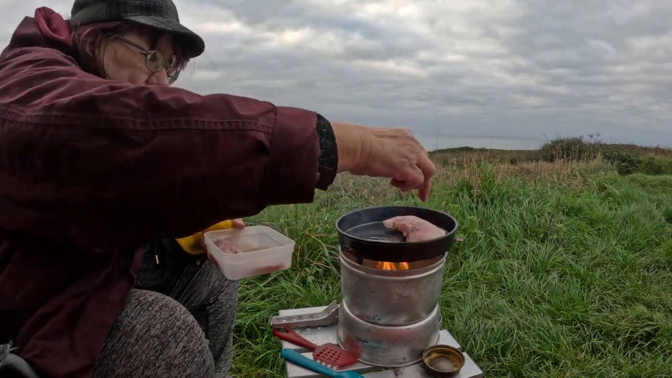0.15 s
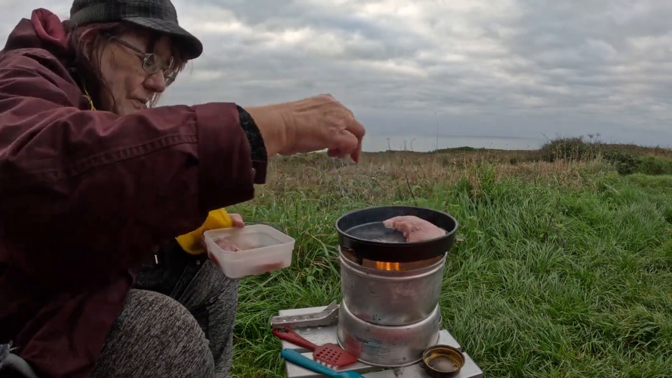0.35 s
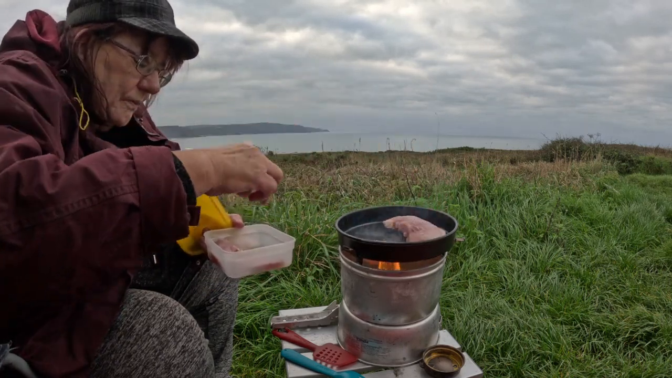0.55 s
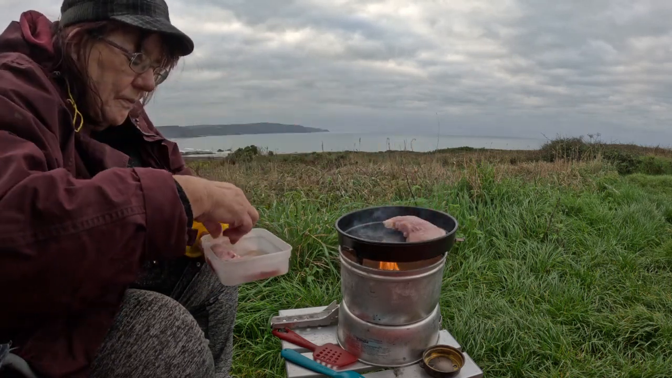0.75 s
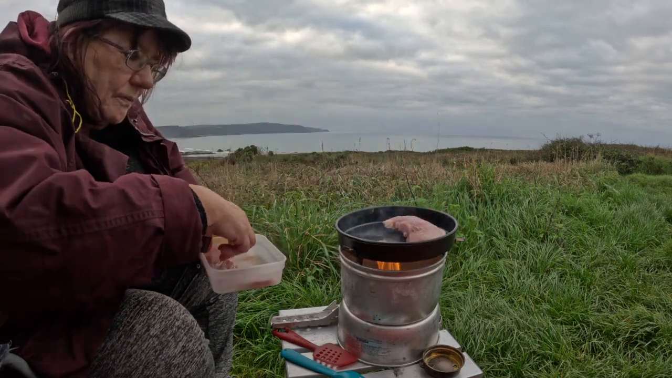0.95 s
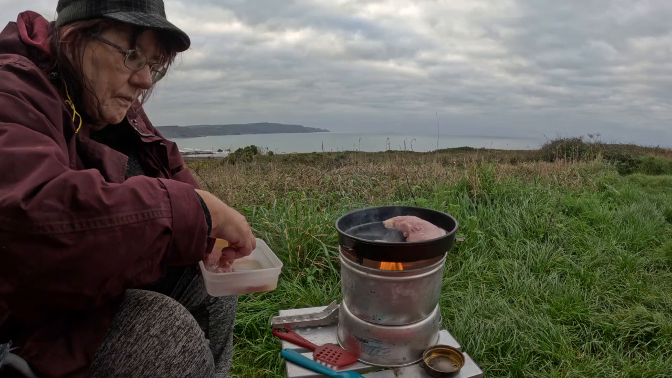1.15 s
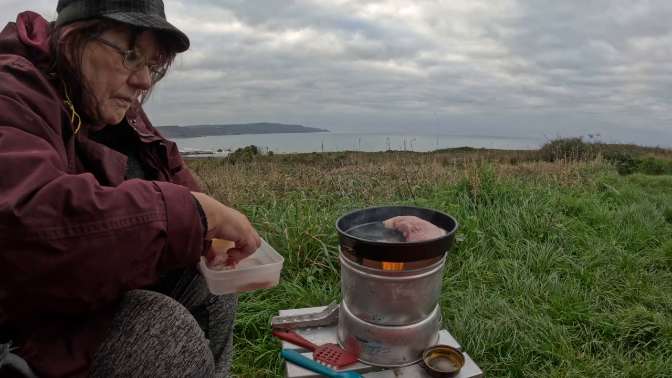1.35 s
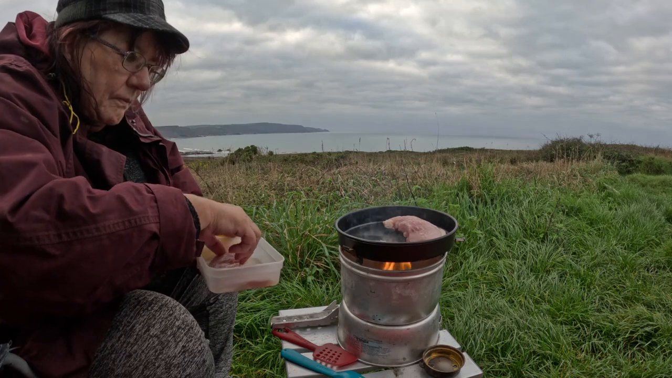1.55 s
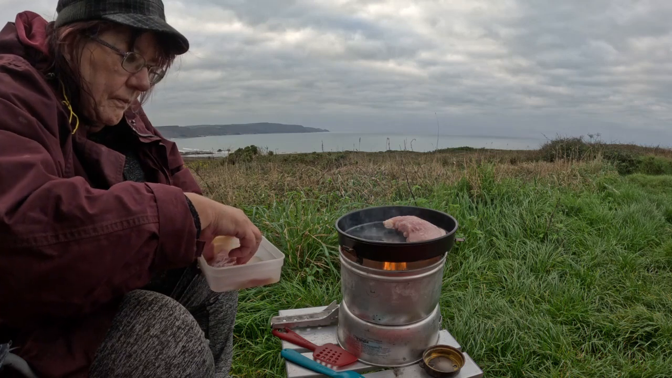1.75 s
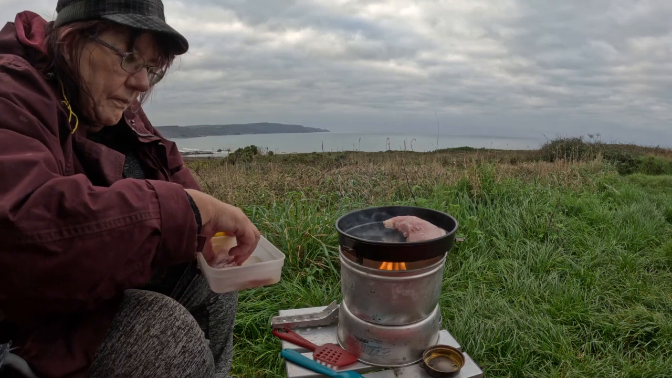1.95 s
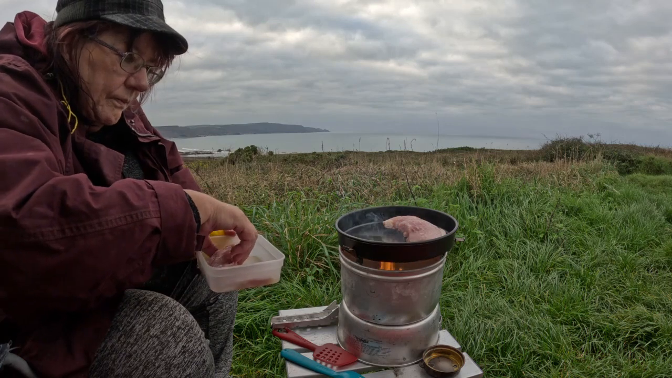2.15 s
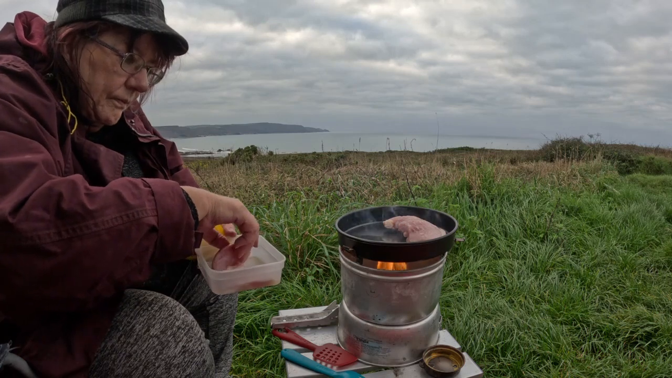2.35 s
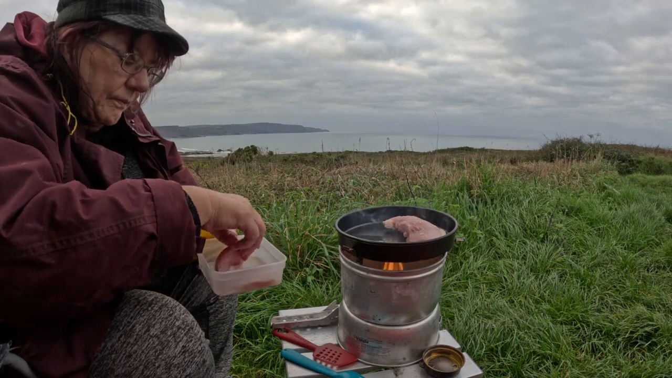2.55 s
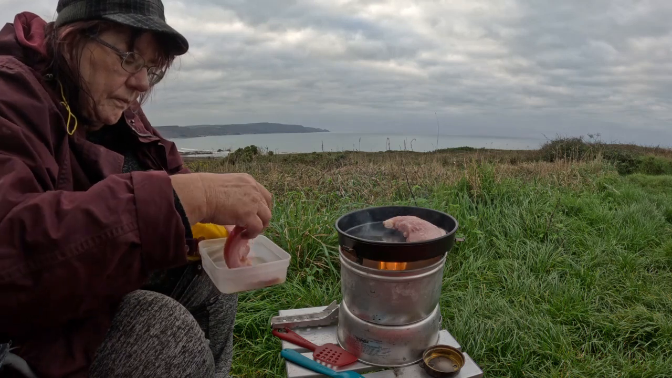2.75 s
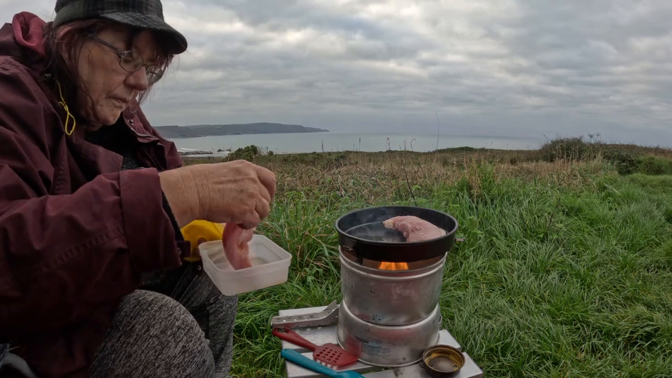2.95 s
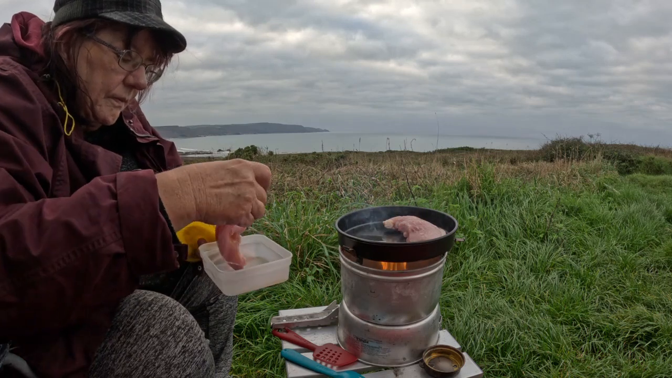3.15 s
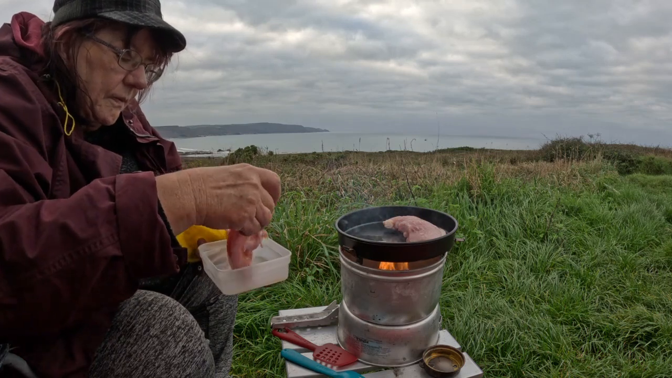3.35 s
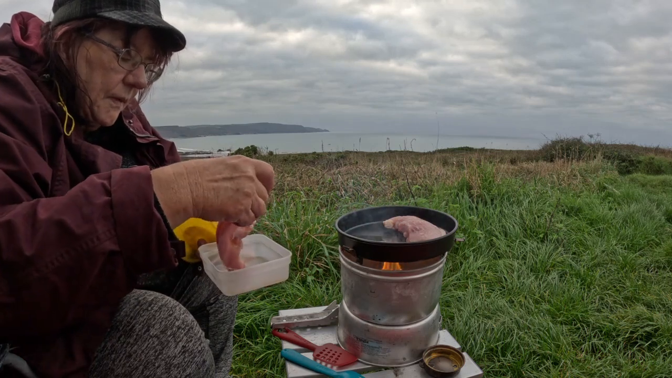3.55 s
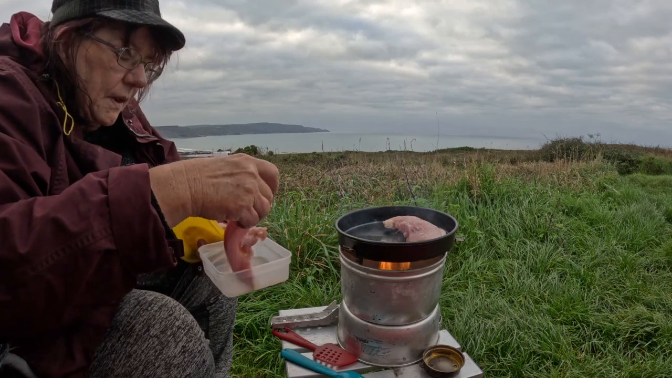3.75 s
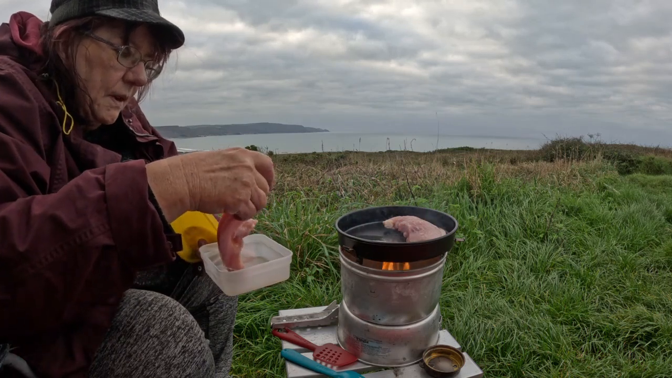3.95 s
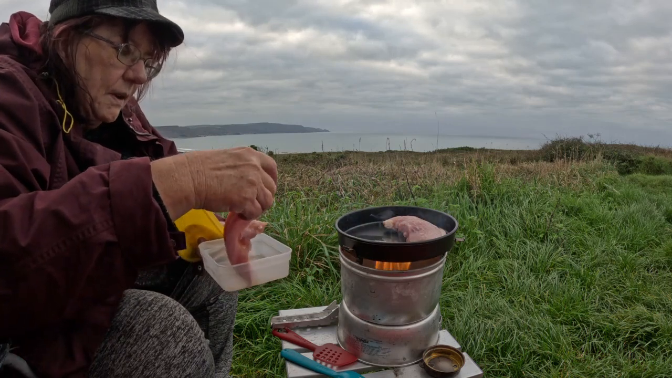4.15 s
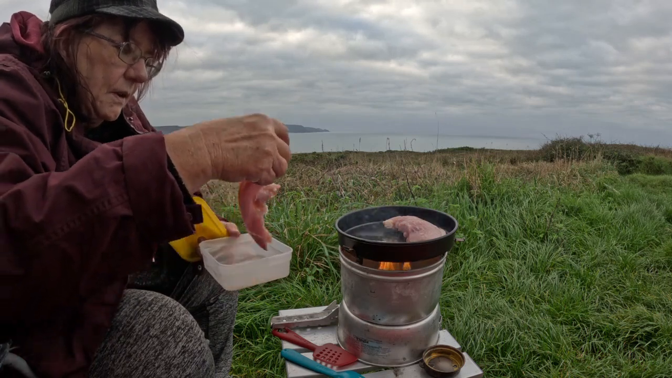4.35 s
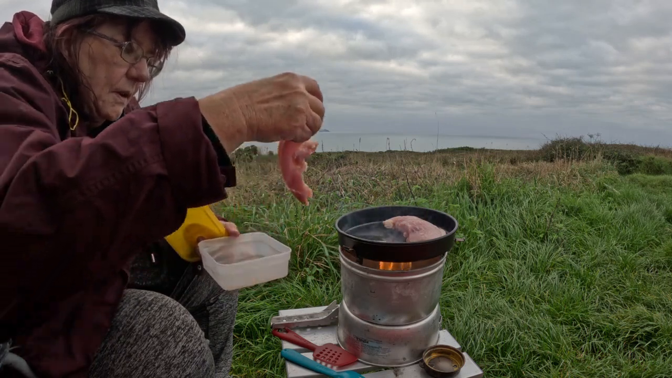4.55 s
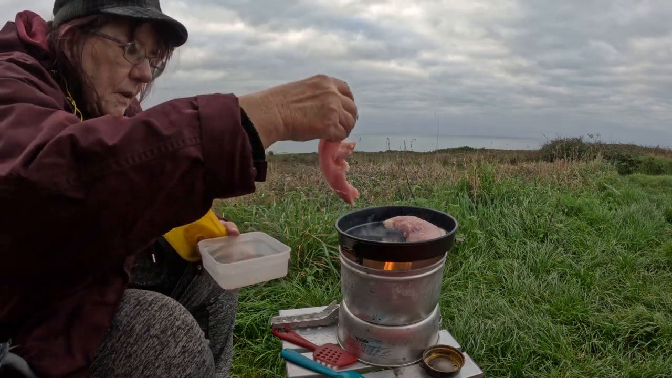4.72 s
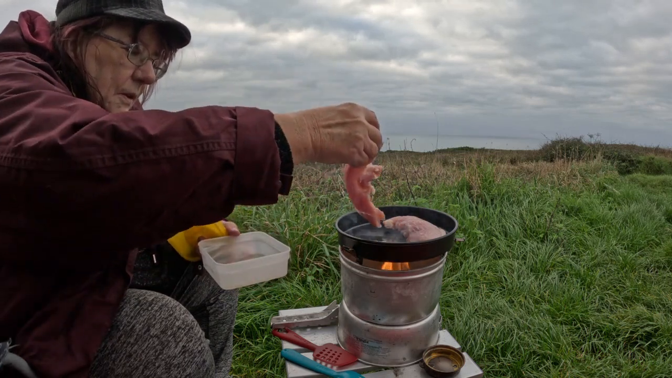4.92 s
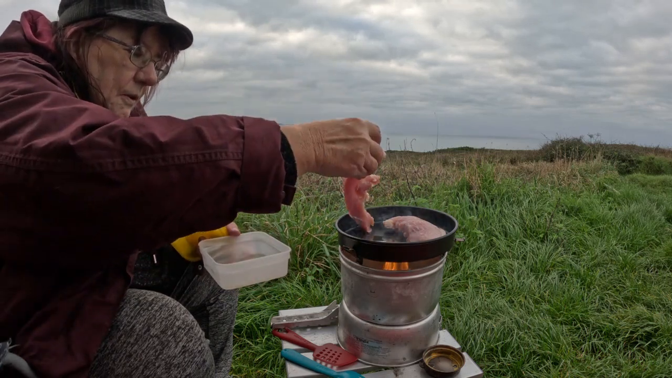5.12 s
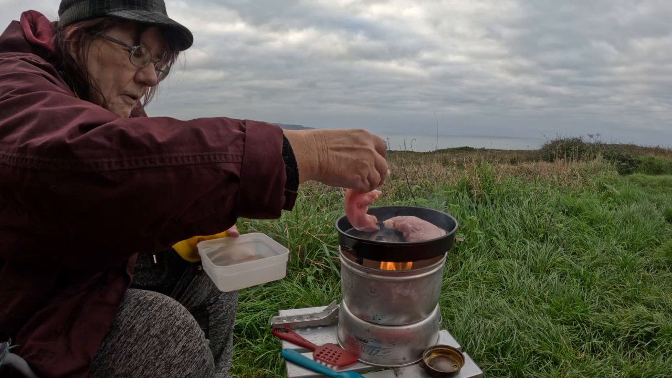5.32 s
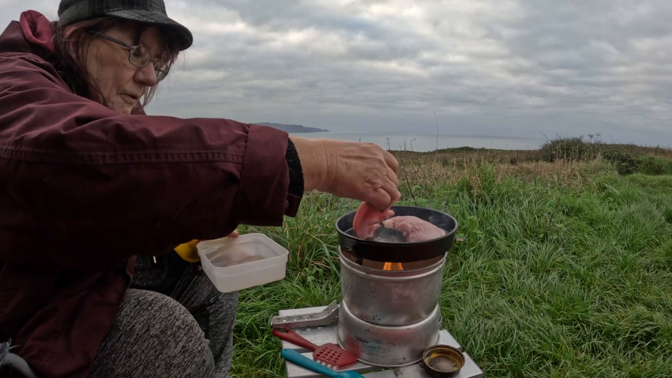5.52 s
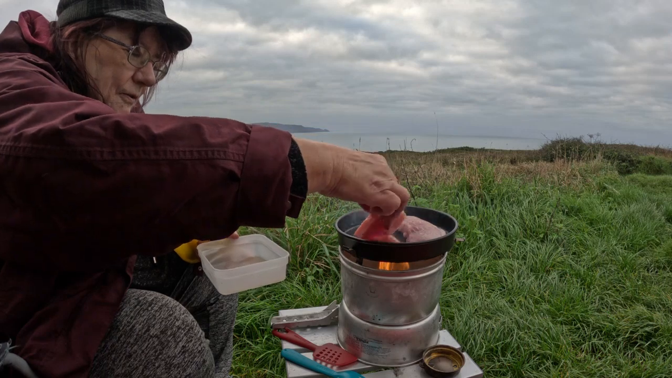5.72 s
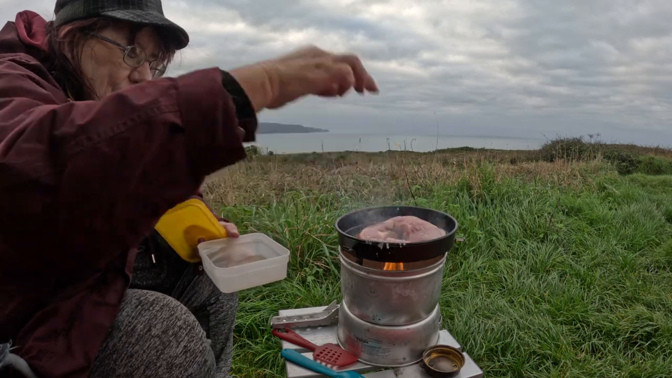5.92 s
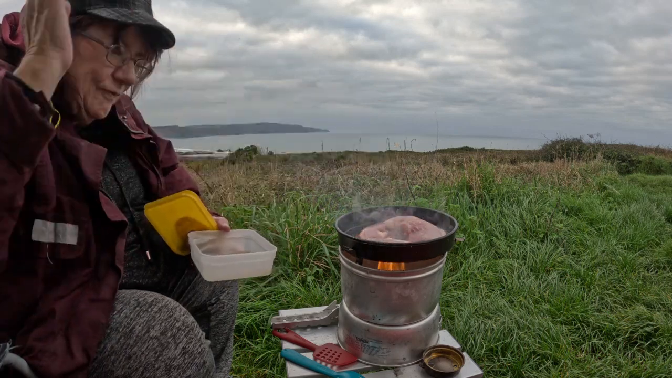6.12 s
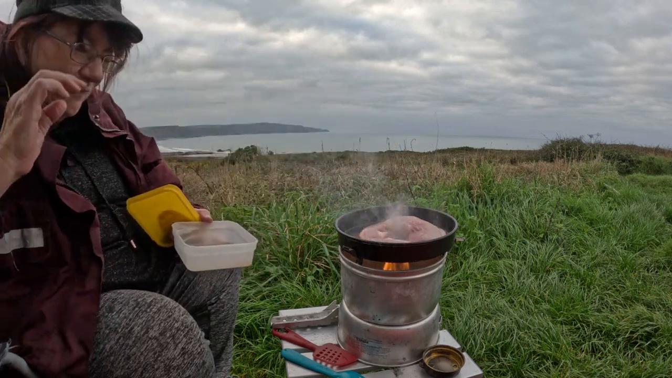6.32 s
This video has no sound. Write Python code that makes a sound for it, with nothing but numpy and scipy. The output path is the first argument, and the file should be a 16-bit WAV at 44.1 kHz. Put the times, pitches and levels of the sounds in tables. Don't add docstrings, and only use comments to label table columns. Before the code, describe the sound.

Steady crackling fry of meat on a camp stove in open air, a brief wind thump on the microphone, then a fierce wet sizzle at the end.

```python
import sys
import numpy as np
from scipy import signal
from scipy.fft import rfft, irfft, next_fast_len
from scipy.io import wavfile
from scipy.ndimage import uniform_filter1d

SR = 44100
rng = np.random.default_rng(int(sys.argv[2]) if len(sys.argv) > 2 else 0)


def ratio(d):
    e = np.asarray(d, float) / 20
    return 10 ** e


def materialize(psi):
    bounded = np.clip(np.atleast_2d(psi).T, -1, 1)
    quanta = np.round(bounded * 32767).astype(np.int16)
    wavfile.write(sys.argv[1], SR, quanta)


N = 281358
SECONDS = np.arange(N) / SR
SECOND_PIECE_S = 5.44

# time in seconds, wind level in dB, surf level in dB.
AIR_LEVELS = [(0, -34, -42), (.4, -41, -44.5), (1.0, -30, -41), (1.3, -38, -39.5), (2.0, -41, -39),
              (2.6, -36.5, -45), (3.3, -35.5, -45), (3.9, -35.5, -51.5), (4.3, -28.5, -45), (4.7, -33, -45),
              (5.2, -34.5, -49), (5.56, -34.5, -52), (5.7, -36, -51), (6.0, -33, -60), (6.13, -43, -50),
              (6.38, -40, -56)]
# frequency in Hz, level in dB per Hz.
WIND_COLOUR = [(8.8, -50), (15, -0.5), (54, 2.5), (67, -1.5), (86, -7.5), (100, -12.5), (130, -48),
               (220, -120)]
# frequency in Hz, level in dB per Hz.
SURF_COLOUR = [(44, -39.5), (75, 5), (86, -4), (117, 1.5), (230, -11), (300, -52), (510, -120)]
# frequency in Hz, level in dB per Hz.
HISS_COLOUR = [(110, -30.5), (180, -4), (226, -8), (248, -6.5), (286, -3), (316, -9.5), (340, -8),
               (860, -12.5), (1120, -50), (1890, -120)]
# time in seconds, firing rate in Hz, level in dB at that rate and at its double.
ENGINE_WORK = [(0, 56.04, -40, -44), (.7, 57, -40, -48), (1.3, 56.27, -43, -45), (1.6, 57.8, -43, -82),
               (2.2, 62.1, -50.5, -65), (3, 61.5, -45, -53), (4.2, 62.02, -45.5, -63), (5, 56.9, -53, -58),
               (5.6, 55.95, -43.5, -53), (6.1, 54, -35.5, -58), (6.38, 53.3, -63, -59)]
# frequency in Hz, rms level in dB.
HUM_LINES = [(167, -64.5), (222, -63), (283, -69.5), (345, -71.5)]
# start in seconds, height in dB, eddies per second, length in seconds.
BUFFETS = [
    (5.736, -11, 25.9, .1),
    (5.84, -20, 22.8, 0.12),
    (5.764, -21, 75, 0.1),
]

# start in seconds, peak in dB, pitch in Hz,
# time to fade by 60 dB in seconds.
KNOCK_EVENTS = [(.152, -30, 626, 0.086), (.652, -37, 275, 0.12), (.668, -37, 298, .12),
                (3.6, -38, 560, 0.047), (4.084, -38, 950, 0.044), (4.083, -31, 1350, 0.033),
                (4.085, -33, 1800, 0.054), (4.084, -29, 2180, .035), (3.3, -44, 530, 0.03),
                (3.898, -35, 855, 0.018), (0.46, -39, 3700, 0.046), (6.3, -28, 1266, .02),
                (5.553, -30, 2150, .02)]

# time in seconds, level in dB.
FIRST_BOIL = [
    (0, -24.5),
    (.012, -36.5),
    (.11, -40.5),
    (.16, -28.5),
    (.46, -30.5),
    (1.1, -32.5),
    (2.0, -34.5),
    (5.1, -35),
    (5.36, -33.5),
]
# time in seconds, level in dB.
SECOND_BOIL = [
    (5.44, -35.5),
    (5.561, -32),
    (5.63, -29.5),
    (5.75, -26.5),
    (5.87, -27.5),
    (5.92, -22),
    (6.0, -20),
    (6.2, -20.5),
    (6.38, -21),
]
# peak in seconds, level in dB.
FLASHES_OF_SPRAY = [
    (.343, -36),
    (.445, -38),
    (1.69, -40),
    (5.24, -40),
    (5.33, -39),
    (5.43, -38),
    (5.637, -26),
    (5.762, -21.5),
    (5.88, -26),
]
# peak in seconds, level in dB.
COLLAPSES = [
    (5.59, -46),
    (5.8, -46),
    (5.93, -37),
    (6.0, -41),
    (6.09, -37),
    (6.14, -31),
    (6.2, -36),
    (6.3, -36),
    (6.375, -38),
]
# peak in seconds, level in dB, pitch in Hz.
STEAM_SQUIRTS = [(5.51, -31, 3290), (5.585, -22.5, 3110), (5.605, -25, 2450), (5.63, -25, 3194),
                 (5.66, -28.5, 3320), (5.7, -25, 3170), (5.738, -17.5, 4010), (5.752, -30, 3550),
                 (5.928, -29, 3686), (5.96, -25, 2400), (6.005, -19, 3300), (6.037, -19, 3960),
                 (6.142, -20.5, 3505), (6.25, -22, 3140)]
# start in seconds, peak
# in dB, pitch in Hz.
SPIT_EVENTS = [(0.2263, -12, 2680), (0.2946, -13, 2660), (0.342, -4.5, 5750), (0.349, -10, 6500),
               (0.425, -5, 4820), (0.448, -6, 5670), (0.6412, -11, 4070), (1.381, -11, 2680),
               (1.679, -10, 6000), (1.691, -11, 3260), (1.8324, -11.5, 6700), (0.811, -17, 3800),
               (2.09, -10.5, 4880), (2.6194, -13, 2930), (3.367, -12, 3860), (3.647, -11.5, 7010),
               (4.807, -12.5, 7370), (5.205, -14, 3820),
               (5.6374, -5.5, 7640), (5.649, -9, 7750), (5.7778, -5, 7500), (5.871, -4, 8060),
                (5.926, 0, 3710), (5.997, -3, 3440), (6.0367, -10, 4030), (6.0886, -7, 4016),
                (6.14, -3, 3400), (6.1587, -5, 3020), (6.256, -3, 3240)]
# peak in
# seconds, level in dB, pitch in Hz.
POP_EVENTS = [(0.167, -21, 2800), (0.2284, -17, 5380), (0.2937, -15, 4570), (0.35, -18, 2580),
              (0.4471, -11, 5680), (0.5661, -20, 2760), (0.643, -17.5, 4010), (0.9818, -25, 3700),
              (1.362, -16, 2580), (1.4604, -22, 2630), (1.5478, -23, 4220), (1.594, -17, 8140),
              (1.68, -16, 7880), (1.6911, -20, 3960), (1.7386, -23, 2760), (1.8364, -19, 3920),
              (1.91, -24, 3770), (2.054, -24, 3790), (2.0929, -20, 2630), (2.2328, -21, 3960),
              (2.2399, -22, 2930), (2.354, -23, 3790), (2.367, -19, 3750), (2.4458, -17, 3700),
              (2.512, -19, 2900), (2.545, -23, 3960), (2.5811, -22, 4010), (2.6197, -16, 3700),
              (2.789, -19, 3810), (2.8789, -22, 3880), (3.0023, -26, 3880), (3.0076, -24, 3880),
              (3.0812, -17, 3830), (3.1668, -20, 3750), (3.2318, -14, 3820), (3.2987, -23, 2930),
              (3.368, -21, 3830), (3.412, -23, 3625), (3.5636, -25, 3230), (3.648, -20, 7110),
              (3.69, -23, 3150), (3.721, -24, 2670), (4.0834, -17, 3750), (4.144, -23, 3790),
              (4.212, -23, 3960), (4.3715, -15, 3750), (4.4257, -27, 2760), (4.484, -24.5, 2880),
              (4.665, -18, 3650), (4.6762, -20, 2800), (4.7176, -17, 3140), (4.7993, -19, 2890),
              (4.8405, -24, 3620), (4.9254, -20, 3750), (5.0232, -27, 3960), (5.0845, -15, 3490),
              (5.1434, -20, 3920), (5.1795, -14, 5940), (5.242, -17, 3960), (5.3951, -22, 7670),
              (5.458, -24, 2757), (5.4701, -20, 3190), (5.4856, -21, 3660), (5.511, -22, 2800),
               (5.5544, -21, 3270), (5.576, -12, 4130), (5.5872, -8, 3270), (5.594, -13, 3235),
               (5.6024, -22.5, 2430), (5.6194, -18, 3060), (5.6294, -16, 3400), (5.6393, -12, 3570),
               (5.6511, -16, 7880), (5.66, -16, 3140), (5.6843, -11, 4360), (5.689, -14, 7360),
               (5.6983, -15, 3830), (5.7072, -14, 4010), (5.7367, -10, 4010), (5.742, -12, 4180),
               (5.7807, -14, 5940), (5.7935, -13, 3620), (5.823, -16, 5640), (5.8348, -19, 6130),
               (5.844, -13, 5730), (5.8746, -11, 5120), (5.887, -11, 3750), (5.9059, -9, 3700),
               (5.9109, -10, 3570), (5.9285, -9, 3960), (5.9446, -10, 3490), (5.9529, -14, 3660),
               (5.967, -6, 4440), (5.9964, -10, 3450), (6.0118, -3, 2540), (6.0215, -8, 3320),
               (6.041, -9, 4010), (6.0508, -9, 2630), (6.0622, -10, 3490), (6.0695, -12, 3490),
               (6.0907, -11, 3360), (6.0968, -14, 3880), (6.1174, -7, 3660), (6.1329, -11, 2450),
               (6.1427, -8, 2330), (6.161, -11, 3190), (6.1672, -9, 2630), (6.1898, -13, 4180),
               (6.2063, -14, 3660), (6.2233, -5, 2900), (6.2293, -7, 3530), (6.2382, -7, 2840),
               (6.2559, -9, 3450), (6.2741, -8, 3620), (6.299, -7, 3530), (6.3049, -11, 7280),
               (6.3113, -11, 3660), (6.3399, -7, 3060), (6.371, -11, 2540), (6.3756, -10, 5560)]

# frequency in Hz, level in dB per Hz.
BURST_COLOUR = [(300, -14.5), (600, -14.5), (1000, -13), (1600, -12), (2300, -7), (3200, -3.5), (5000, -6),
                (7000, -7), (9000, -12), (11000, -12), (13000, -20.5), (14500, -40), (16000, -76)]
# frequency in Hz, width in Hz, height in dB.
FIRST_PAN = [(685, 100, 8), (840, 37, -11), (1165, 700, 6.5), (1417, 52, 4.5), (1452, 37, -6),
             (1814, 59, 11.5), (1900, 154, -9), (2210, 22, 5.5), (2344, 100, -8.5), (2640, 99, 2),
             (2680, 410, 3.5), (3230, 270, -3.5), (3350, 130, 0.5), (3740, 750, 5.5), (4830, 290, 3.5),
             (5520, 200, -2), (6030, 35, 7), (6250, 80, 0.5), (6700, 200, -2.5), (7370, 114, 7),
             (7850, 230, 6), (8400, 180, 3), (9260, 300, 2.5), (10380, 190, 4)]
# frequency in Hz, width in Hz, height in dB.
SECOND_PAN = [(568, 110, -8.5), (704, 95, 7.5), (827, 127, -20), (917, 46, 6.5), (1400, 58, 6),
              (1520, 100, -7.5), (1960, 106, -16), (2590, 460, 0), (3040, 320, -7), (3710, 360, 3),
              (5080, 110, 6.5), (5680, 110, 9), (6340, 93, 6.5), (7280, 400, 5), (7880, 420, 7.5),
              (10500, 260, 2.5), (15000, 980, -16)]
# delay in seconds, strength as a ratio.
FIRST_ECHOES = [(.00155, 0.044), (.0037, 0.079), (.00415, 0.16)]
# delay in seconds, strength as a ratio.
SECOND_ECHOES = [(.00152, 0.1), (.0021, 0.048), (.0036, .1)]
# frequency in Hz, side level against mid in dB.
STEREO_SPREAD = [(25, -21), (60, -11), (110, -36), (200, -10), (400, -8.5), (1000, -12), (2500, -9),
                 (5000, -6.5), (8000, -8), (12000, -5.5), (15000, 15.5)]
# frequency in Hz, phase in radians.
LEFT_RIGHT_PHASE = [(200, 0), (1100, -0.77), (1800, 1.36), (2800, -0.58), (4700, 0.46), (8000, -0.56),
                    (11000, -0.5), (15000, 2.5)]
# frequency in Hz, level in dB.
LEFT_RIGHT_LEVEL = [(60, 0.39), (110, 0.39), (200, 0.0), (380, -0.43), (700, -0.34), (1290, -0.36),
                    (2380, -1.8), (4400, 0.16), (8120, -0.5), (15000, 1.0)]

SMALL_DB, LARGE_DB, DEEP_DB = (-2.5, -4), (-12, -11.5), (-3, -5.5)
FLASH_RISE_S, FLASH_FALL_S = 0.0027, 0.078
COLLAPSE_RISE_S, COLLAPSE_FALL_S = 0.019, 0.04


def rms_one(x):
    return x / np.sqrt(np.mean(x ** 2) + 1e-20)


def in_time(rows):
    s, *columns = np.transpose(rows)
    return [np.interp(SECONDS, s, column) for column in columns]


def at_hz(points, hz):
    points = np.array(points)
    return np.interp(np.log(hz + 1), np.log(points[:, 0] + 1), points[:, 1])


def drift(rate):
    r = np.exp(-32 * np.pi * rate / SR)
    white = rng.standard_normal(N // 16 + 4002)
    slow = signal.lfilter([1], [1, -2 * r, r * r], white)[4000:]
    return np.interp(np.arange(N) / 16, np.arange(len(slow)), rms_one(slow - slow.mean()))


def spurts(per_s, tail_s):
    kicks = (rng.random(N) < per_s / SR) * np.minimum(rng.exponential(1, N), 2.5)
    shape = signal.lfilter([1], [1, -np.exp(-1 / (tail_s * SR))], kicks)
    return rms_one(shape - shape.mean())


def bursts(rows, rise_s, fall_s):
    return sum(ratio(2 * db) * np.exp(-2 * np.maximum((s - SECONDS) / rise_s, (SECONDS - s) / fall_s))
               for s, db, *_ in rows)


def by_piece(pair):
    return np.interp(SECONDS, [SECOND_PIECE_S, SECOND_PIECE_S + 0.079], pair)


def boil_level():
    return in_time(FIRST_BOIL + SECOND_BOIL)[0]


def ring(s, hz, t60):
    at = round(s * SR)
    t = np.arange(min(int(t60 * SR), N - at)) / SR
    return slice(at, at + len(t)), np.sin(2 * np.pi * hz * t) * ratio(-60 * t / t60)


def band_pass(x, order, low_hz, high_hz):
    return signal.sosfilt(signal.butter(order, [low_hz, high_hz], "band", fs=SR, output="sos"), x)


def colour(x, gain_db):
    size = 2 ** 14
    hz = np.arange(size // 2 + 1) * SR / size
    fold = irfft(gain_db(hz) * np.log(10) / 20, size)
    fold[1:size // 2] *= 2
    fold[size // 2 + 1:] = 0
    impulse = irfft(np.exp(rfft(fold)), size)[:size // 2]
    return signal.oaconvolve(x, impulse)[:len(x)]


def stereo(mid, side, gain_db):
    mid = colour(mid, gain_db)
    side = colour(side, lambda hz: gain_db(hz) + at_hz(STEREO_SPREAD, hz))
    return rms_one(mid + side * [[1], [-1]])


def background():
    calm = np.clip(np.abs(SECONDS - 5.84) / 0.146, 0, 1) ** 4
    boil_db = boil_level()
    wind_db, surf_db = in_time(AIR_LEVELS)
    hiss_db = -48.5 + 0.23 * (boil_db - boil_db.mean())
    layers = [(wind_db, WIND_COLOUR, 2.5, calm), (surf_db, SURF_COLOUR, 1.8, calm), (hiss_db, HISS_COLOUR, 1.2, 1)]
    out = np.zeros((2, N))
    for db, shape, lumpy_db, share in layers:
        level = ratio(db - 2.0 + lumpy_db * drift(4.1)) * share
        out += level * stereo(*rng.standard_normal((2, N)), lambda hz: at_hz(shape, hz))
    firing_hz, first_db, second_db = in_time(ENGINE_WORK)
    turn = 2 * np.pi * np.cumsum(firing_hz + 2.52 * drift(4.8)) / SR
    out += np.sqrt(2) * ratio(first_db + 4.6 * drift(4.8)) * np.sin(turn)
    out += np.sqrt(2) * ratio(second_db + 2.1 * drift(9.5)) * np.sin(2 * turn)
    for hz, db in HUM_LINES:
        turn = 2 * np.pi * np.cumsum(hz + 1.37 * drift(3.35)) / SR
        out += np.sqrt(2) * ratio(db + 4.4 * drift(1.7)) * np.sin(turn)
    return out


def gust():
    push = np.zeros(N)
    for s, db, hz, length in BUFFETS:
        swell = np.sin(np.pi * np.clip((SECONDS - s) / length, 0, 1)) ** 0.47
        swing = np.tanh(1.12 * np.sin(2 * np.pi * hz * (SECONDS - s)))
        push += ratio(db) * swell * (SECONDS < s + length) * swing
    white = rng.standard_normal(N) + 0.083 * rng.standard_normal((2, N))
    eddies = rms_one(band_pass(white, 4, 45, 150))
    flutter = rms_one(band_pass(white, 3, 240, 450))
    strength = 3.4 * uniform_filter1d(push ** 2, 2600)
    uneven = np.array([ratio(0.5) * push, ratio(1.0) * np.roll(push, 40)])
    return uneven + strength * (ratio(-6.5) * eddies + ratio(-25.0) * flutter)


def knocks():
    out = np.zeros(N)
    for s, db, hz, t60 in KNOCK_EVENTS:
        where, shape = ring(s, hz, t60)
        out[where] += ratio(db) * shape
    return out


def spits():
    out, rows = np.zeros((2, N)), SPIT_EVENTS
    for (s, db, hz), noise in zip(rows, rng.standard_normal((len(rows), 3, 1600))):
        where, shape = ring(s, hz, t60=0.025)
        age = np.arange(len(shape))
        ragged = .5 + 3.8 * uniform_filter1d(noise[0], 21)[age]
        wide = noise[1] + 0.56 * noise[2] * [[1], [-1]]
        crackle = band_pass(wide, 2, hz / 1.7, min(hz * 1.47, 11500))[:, age] * ratio(-50 * age / len(age))
        rise = 1 - np.exp(-age / 59.0)
        out[:, where] += ratio(db - 9.5) * rise * (shape * ragged + ratio(-0.5) * crackle)
        out[:, where] += ratio(db - 11) * noise[1, age] * np.exp(-age / (.0006 * SR))
    return band_pass(out, 3, 1900, 11500)


def pops():
    s, db, hz = np.transpose(POP_EVENTS)[:, :, None]
    age = np.arange(-60, 260) / SR
    swell = ratio(db) * np.exp(-np.maximum(-age / 0.00043, age / 0.00099))
    where = np.minimum(np.round((s + age) * SR).astype(int), N - 1)
    rings, cracks, sides = np.zeros((3, N))
    noise = rng.standard_normal((len(s), 2, len(age)))
    np.add.at(rings, where, ratio(-5) * swell * np.sin(2 * np.pi * hz * age))
    np.add.at(cracks, where, swell * noise[:, 0])
    np.add.at(sides, where, 0.3 * swell * noise[:, 1])
    tint = lambda hz: at_hz(BURST_COLOUR, hz) + 8 - 8.5
    return rings + colour(cracks, tint) + colour(sides, tint) * [[1], [-1]]


def pan_db(hz, modes, echoes):
    ripple = 1 + sum(share * np.exp(-2j * np.pi * hz * lag) for lag, share in echoes)
    bumps = sum(db / (1 + (2 * (hz - f) / width) ** 2) for f, width, db in modes)
    return at_hz(BURST_COLOUR, hz) + bumps + 20 * np.log10(np.abs(ripple) + 1e-3)


def through_pan(mid, side, low_hz, high_hz):
    edges = lambda hz: -10 * np.log10((1 + (low_hz / (hz + 1)) ** 12) * (1 + (hz / high_hz) ** 12))
    at = round(SECOND_PIECE_S * SR)
    share = np.clip(np.arange(N - at) / (.12 * SR), 0, 1)
    out = stereo(mid, side, lambda hz: pan_db(hz, FIRST_PAN, FIRST_ECHOES) + edges(hz))
    full = stereo(mid[at:], side[at:], lambda hz: pan_db(hz, SECOND_PAN, SECOND_ECHOES) + edges(hz))
    out[:, at:] = np.sqrt(1 - share) * out[:, at:] + np.sqrt(share) * full
    return out


def bubbles(low_hz, high_hz, per_s, uneven_db, surge_db, patchy_db):
    born = rng.random(N) < per_s / SR
    luck_db = uneven_db * np.minimum(rng.exponential(1, N), 6)
    size = born * ratio(luck_db + surge_db + patchy_db * spurts(40, 0.026))
    mid, side = size * rng.standard_normal((2, N))
    return through_pan(mid, side, low_hz, high_hz)


def gurgle():
    steady = by_piece((0, 1)) * ratio(2 * (boil_level() - 32))
    level = np.sqrt(steady + bursts(COLLAPSES, COLLAPSE_RISE_S, COLLAPSE_FALL_S))
    return level * bubbles(524, 870, per_s=1500, uneven_db=2.5, surge_db=0, patchy_db=1.5)


def squeaks(per_s, cycles):
    born = (rng.random(N) < per_s / SR) * ratio(6.4 * np.minimum(rng.exponential(1, N), 3))
    dealt, out = rng.integers(0, 24, N), np.zeros(N)
    for k, hz in enumerate(np.geomspace(2200, 8500, 24)):
        r, w = ratio(-60 * hz / (cycles * SR)), 2 * np.pi * hz / SR
        struck = born * (dealt == k) + 1e-18
        out += signal.lfilter([np.sin(w)], [1, -2 * r * np.cos(w), r * r], struck)
    return through_pan(out, .5 * np.roll(out, 9), 2130, 6200)


def jet(boil_db, ragged_db, width_hz):
    hz = in_time(STEAM_SQUIRTS)[1]
    leak = ratio(2 * (boil_db - 12))
    level = np.sqrt(leak + bursts(STEAM_SQUIRTS, rise_s=0.007, fall_s=0.011))
    turn = 2 * np.pi * np.cumsum(hz + 150 * drift(40.74)) / SR
    low_pass = signal.butter(2, width_hz / 2, fs=SR, output="sos")
    wobble = signal.sosfilt(low_pass, rng.standard_normal((2, N)))
    band = rms_one(wobble[0] * np.cos(turn) + wobble[1] * np.sin(turn))
    flowing = SECONDS > SECOND_PIECE_S
    return flowing * level * ratio(ragged_db * spurts(90, 0.0037)) * band


def sizzle():
    boil_db = boil_level()
    deep_db = by_piece(DEEP_DB) - .3 * SECONDS * by_piece((1, 0))
    shade_db = -3 * np.interp(SECONDS, (5.24, 5.3, 5.43, 5.45), [0, 1, 1, 0])
    pooled_db = 4 * np.clip((SECONDS - 6.06) / 0.026, 0, 1)
    flashing = bursts(FLASHES_OF_SPRAY, FLASH_RISE_S, FLASH_FALL_S)
    fine = np.sqrt(ratio(2 * (boil_db + by_piece(SMALL_DB))) + flashing)
    stirred = ratio(2 * -9) * bursts(COLLAPSES, COLLAPSE_RISE_S, COLLAPSE_FALL_S)
    fat = np.sqrt(ratio(2 * (boil_db + by_piece(LARGE_DB) + pooled_db)) + stirred)
    surge = 0.23 * spurts(25, 0.024) + 1.0 * spurts(150, 0.0084) + by_piece((0, .5)) * spurts(53, 0.0081)
    deep = bubbles(2320, 2990, per_s=9800, uneven_db=2.0, surge_db=0.5 * surge, patchy_db=0.57)
    upper = bubbles(3190, 4750, per_s=11000, uneven_db=1.65, surge_db=0.59 * surge, patchy_db=0.83)
    left_over = np.sqrt(np.clip(1 - ratio(2 * deep_db), .15, 1))
    medium = ratio(deep_db) * deep + ratio(-0.8) * left_over * upper
    small = bubbles(5070, 9020, per_s=14000, uneven_db=1.5, surge_db=0.82 * surge, patchy_db=0.67)
    tiny = bubbles(9600, 19000, per_s=14000, uneven_db=2.5, surge_db=0.8 * surge, patchy_db=-0.1)
    large = bubbles(788, 2075, per_s=9000, uneven_db=1.0, surge_db=0.42 * surge, patchy_db=1.12)
    mixed = medium + ratio(by_piece((-12, -7.5))) * squeaks(per_s=500, cycles=60)
    out = ratio(boil_db + shade_db) * mixed
    out += jet(boil_db, ragged_db=1.7, width_hz=460)
    out += fine * (small + ratio(-6.5) * tiny)
    return out + ratio(1.5) * fat * large


def roam(x):
    _, _, cells = signal.stft(x, nperseg=512, noverlap=384)
    field = rng.standard_normal(cells.shape[1:])
    for _ in range(2):
        field = uniform_filter1d(field, size=3, axis=0, mode="wrap")
        field = uniform_filter1d(field, size=11, axis=1, mode="wrap")
    gain = ratio(1.04 * rms_one(field))
    gain = gain / np.sqrt(np.mean(gain ** 2))
    return signal.istft(cells * gain, nperseg=512, noverlap=384)[1][:, :N]


def scene():
    around = background() + gust()
    single_events = knocks() + spits() + pops()
    return around + single_events + gurgle() + roam(sizzle())


def top_cut(x):
    return signal.sosfilt(signal.butter(12, 15640, fs=SR, output="sos"), x)


def record(dry):
    size = next_fast_len(N + 4096)
    hz = np.arange(size // 2 + 1) * SR / size
    skew = ratio(at_hz(LEFT_RIGHT_LEVEL, hz) / 2) * np.exp(.5j * at_hz(LEFT_RIGHT_PHASE, hz))
    mix = irfft(rfft(dry, size) * [skew, 1 / skew], size)[:, :N]
    return top_cut(mix)


dry = scene()
out = record(dry)
materialize(out)
```